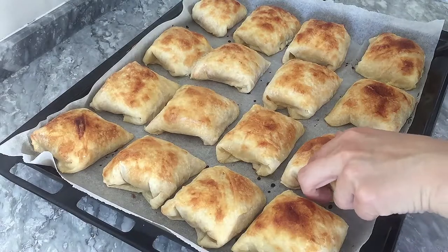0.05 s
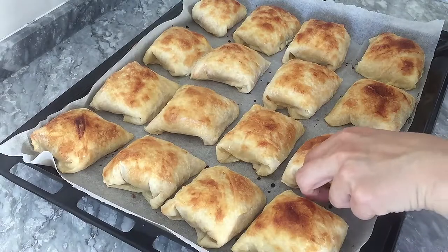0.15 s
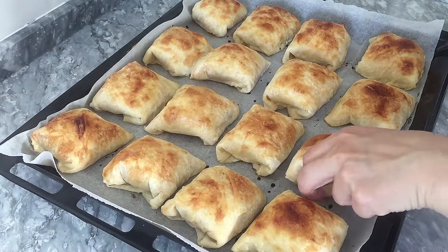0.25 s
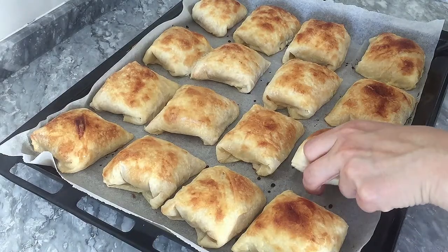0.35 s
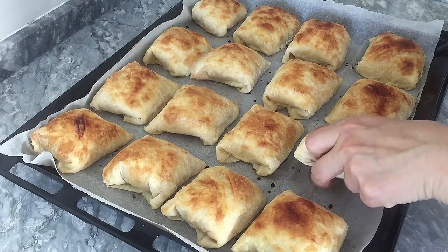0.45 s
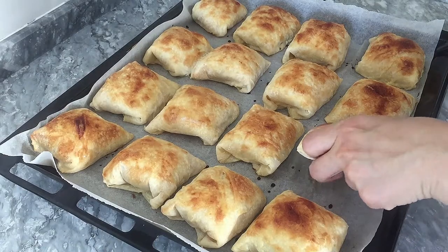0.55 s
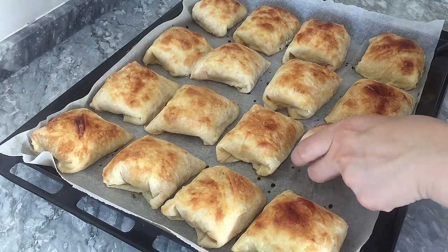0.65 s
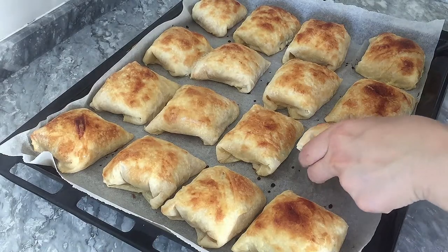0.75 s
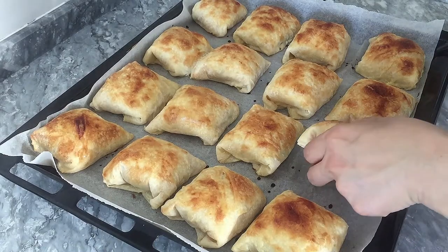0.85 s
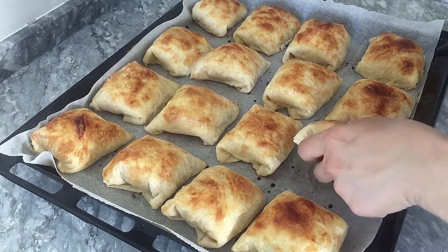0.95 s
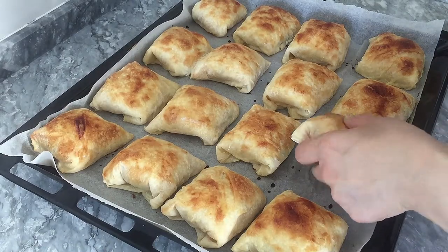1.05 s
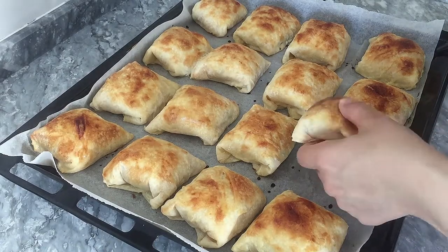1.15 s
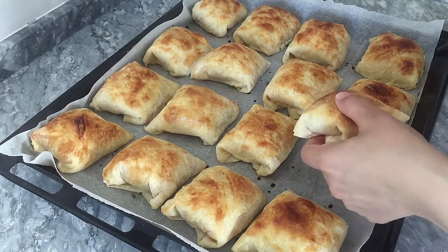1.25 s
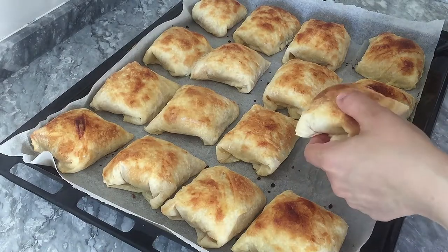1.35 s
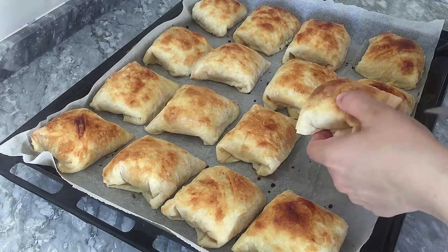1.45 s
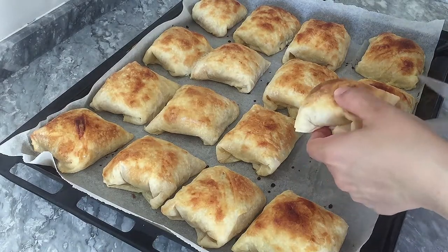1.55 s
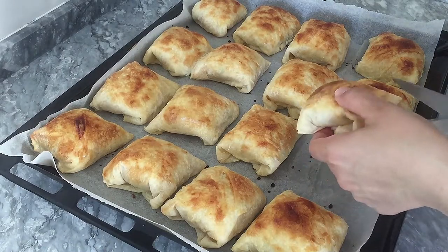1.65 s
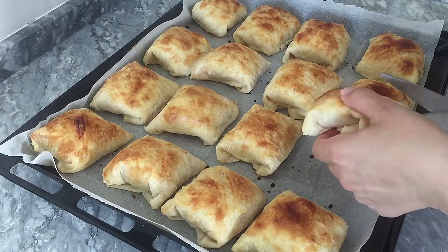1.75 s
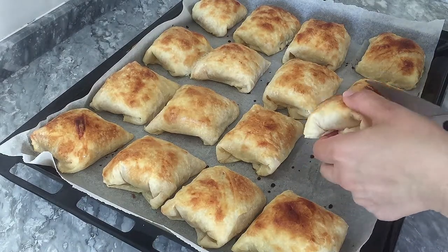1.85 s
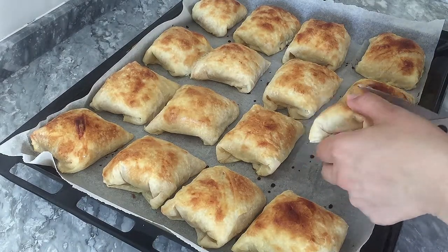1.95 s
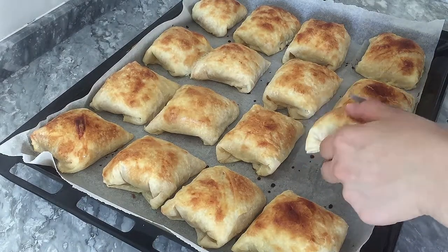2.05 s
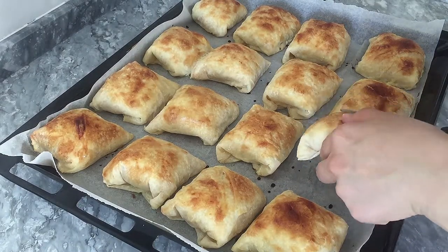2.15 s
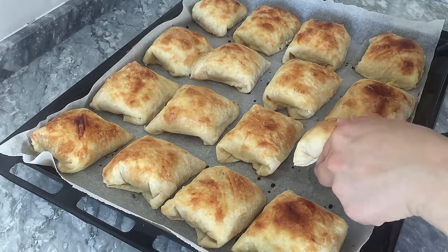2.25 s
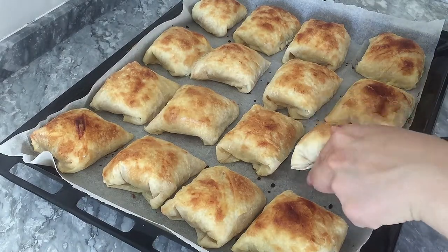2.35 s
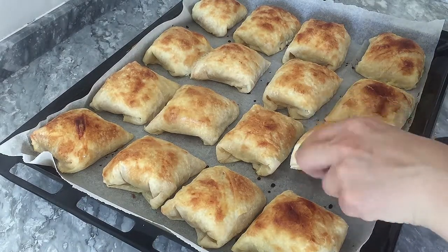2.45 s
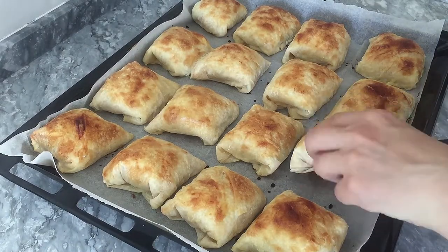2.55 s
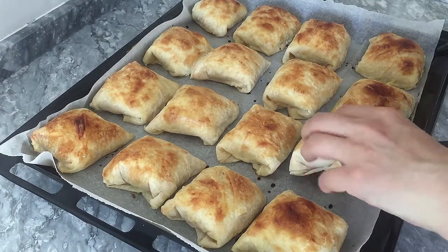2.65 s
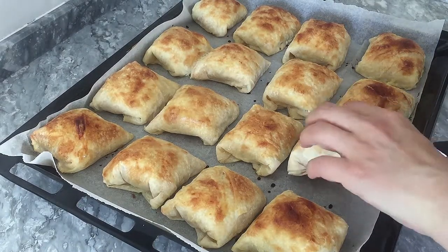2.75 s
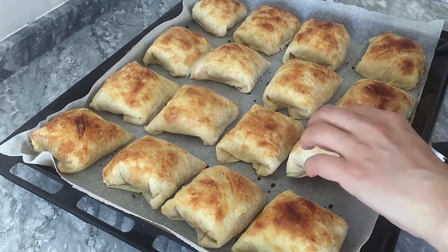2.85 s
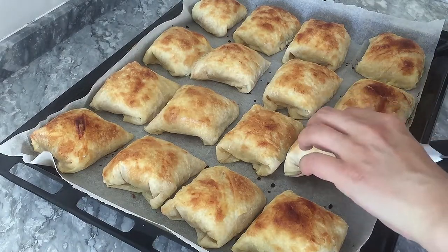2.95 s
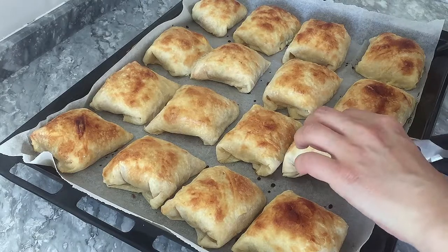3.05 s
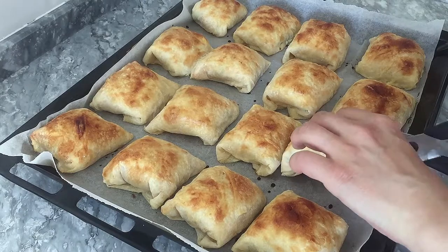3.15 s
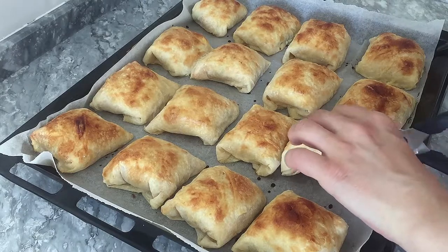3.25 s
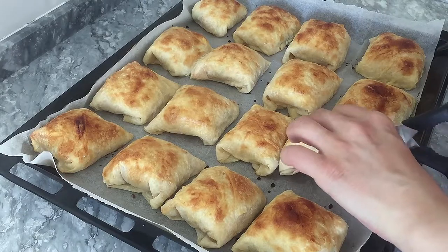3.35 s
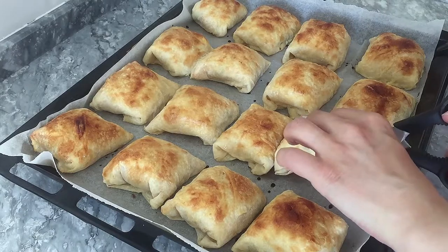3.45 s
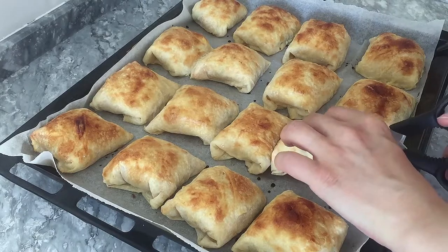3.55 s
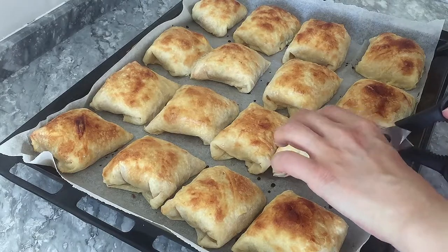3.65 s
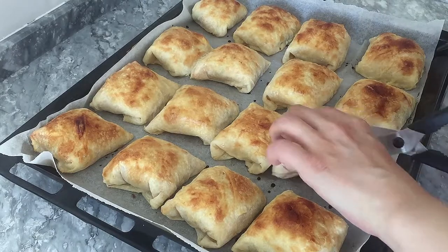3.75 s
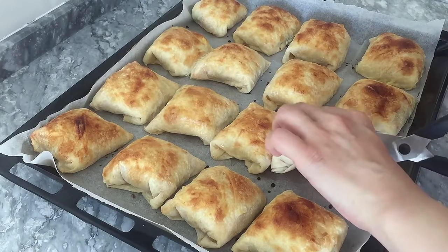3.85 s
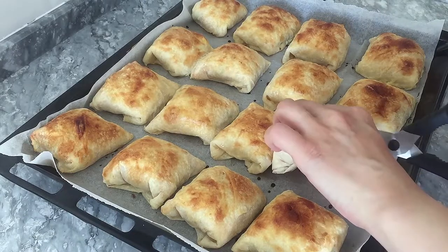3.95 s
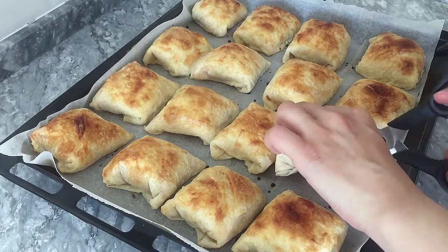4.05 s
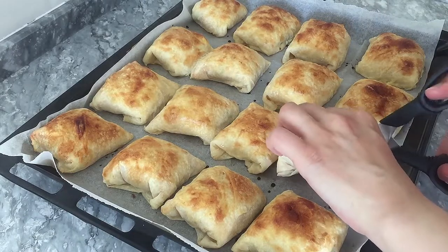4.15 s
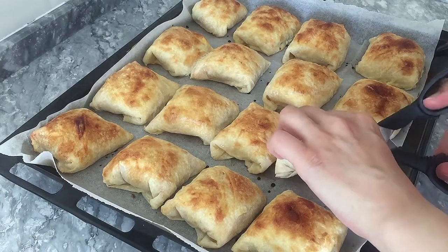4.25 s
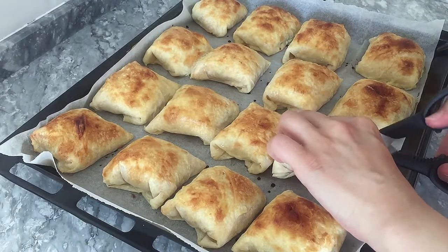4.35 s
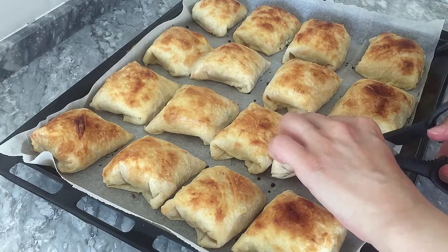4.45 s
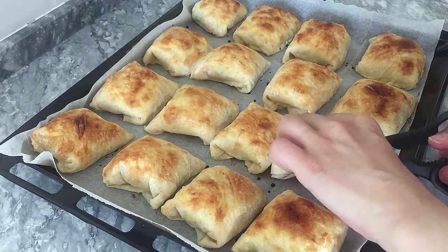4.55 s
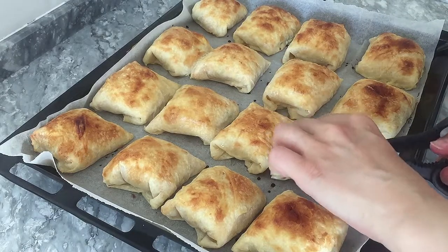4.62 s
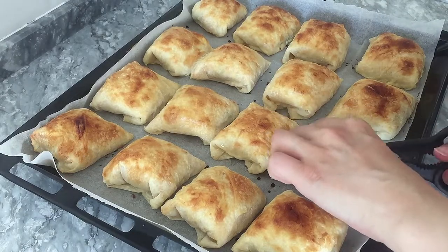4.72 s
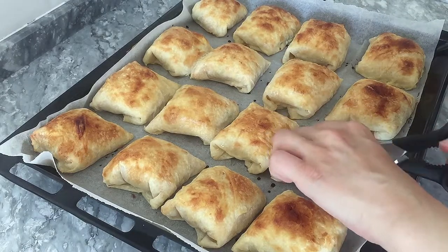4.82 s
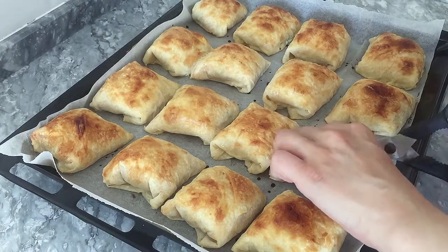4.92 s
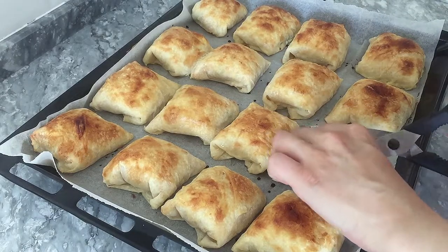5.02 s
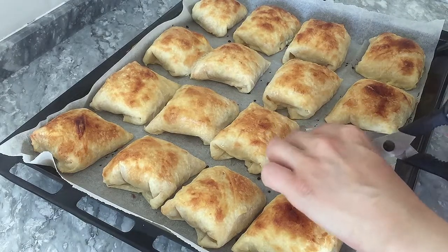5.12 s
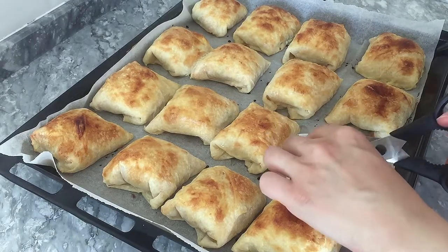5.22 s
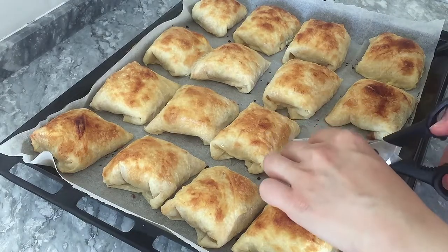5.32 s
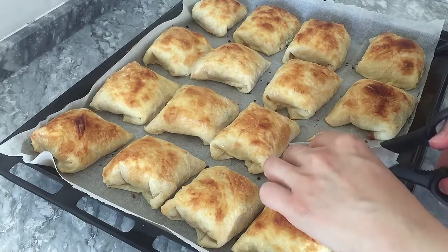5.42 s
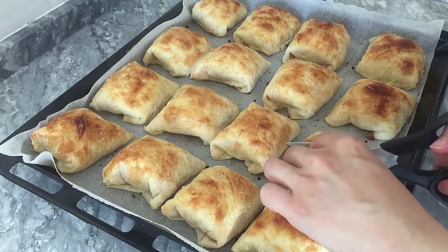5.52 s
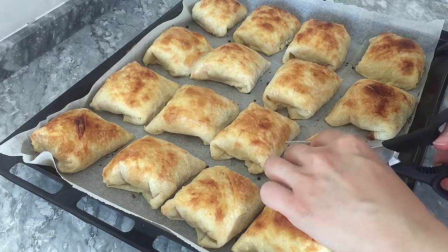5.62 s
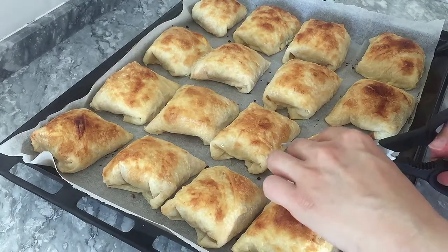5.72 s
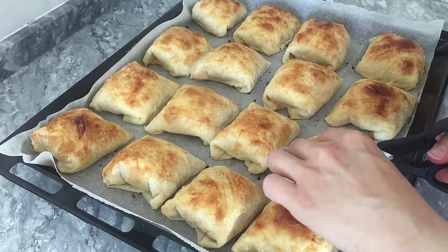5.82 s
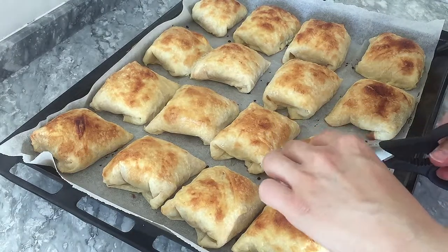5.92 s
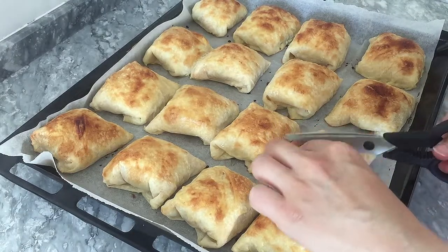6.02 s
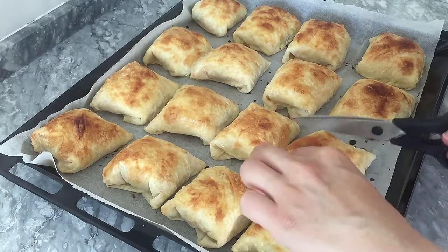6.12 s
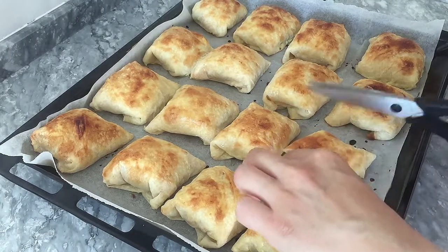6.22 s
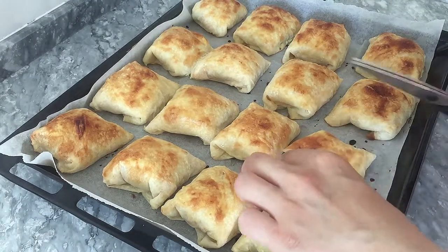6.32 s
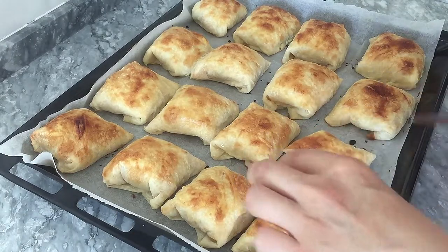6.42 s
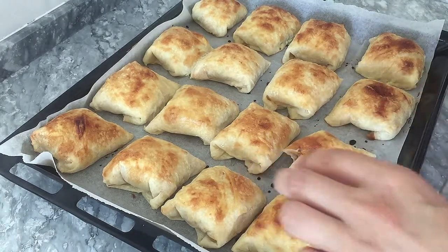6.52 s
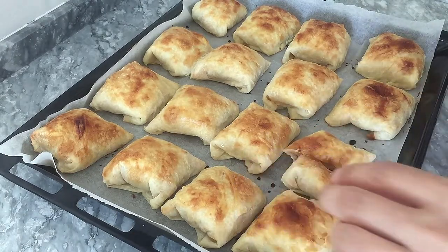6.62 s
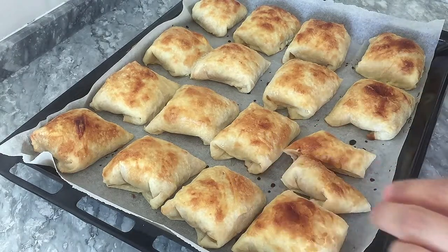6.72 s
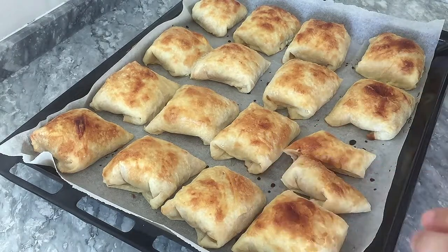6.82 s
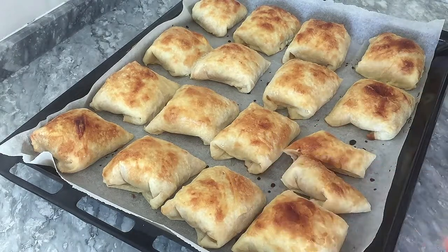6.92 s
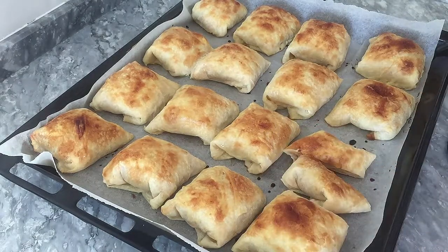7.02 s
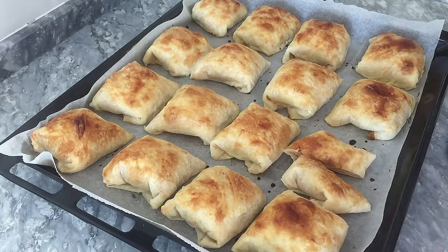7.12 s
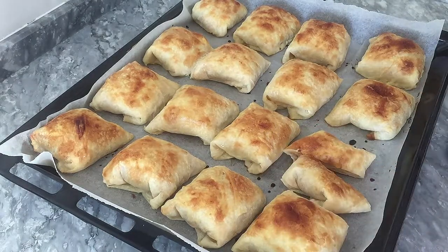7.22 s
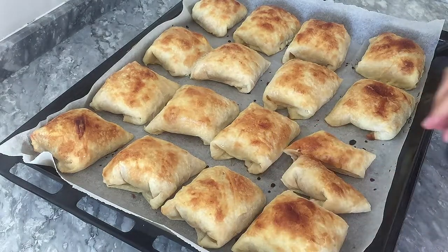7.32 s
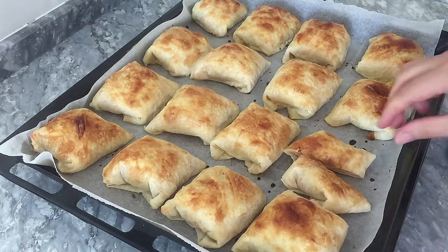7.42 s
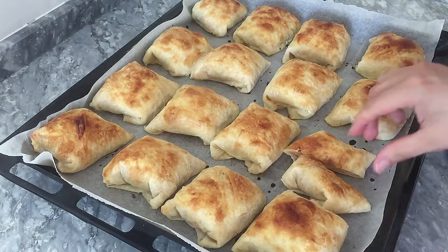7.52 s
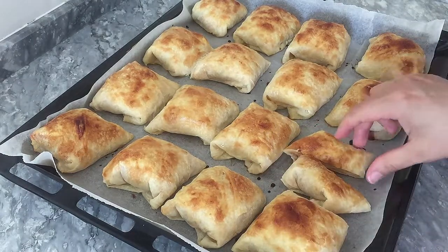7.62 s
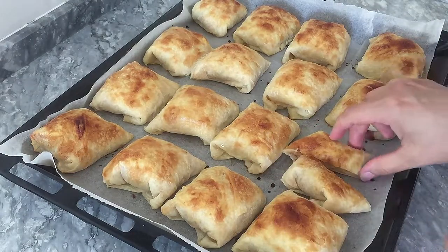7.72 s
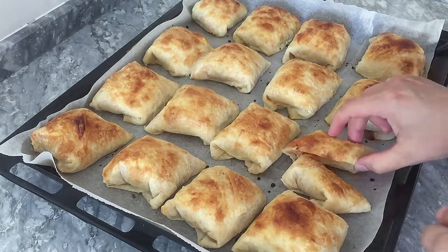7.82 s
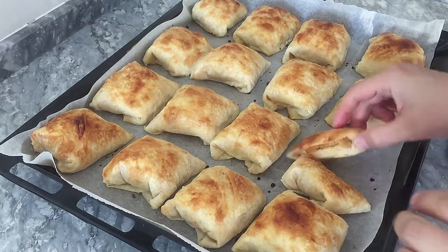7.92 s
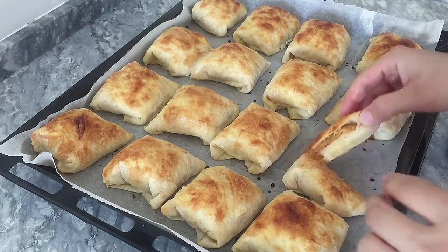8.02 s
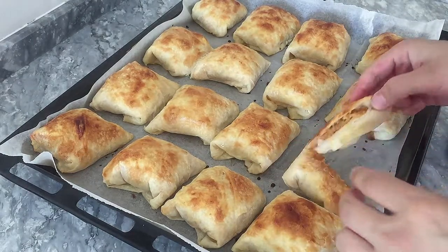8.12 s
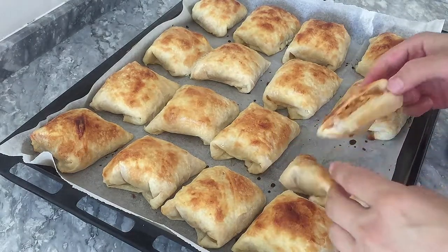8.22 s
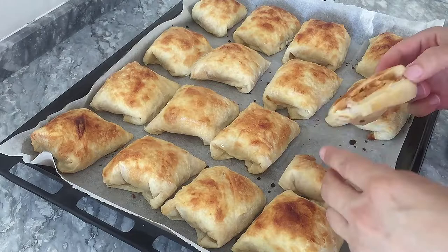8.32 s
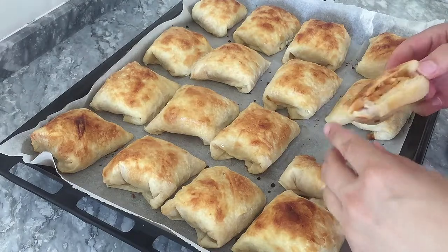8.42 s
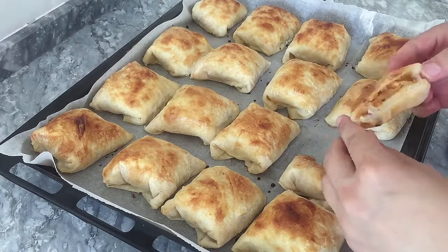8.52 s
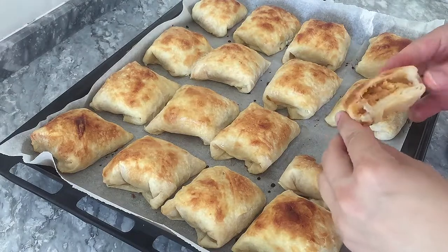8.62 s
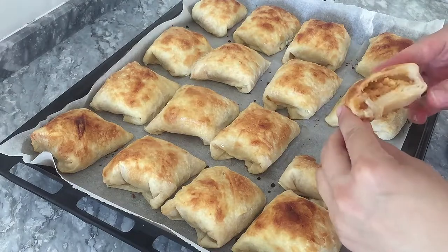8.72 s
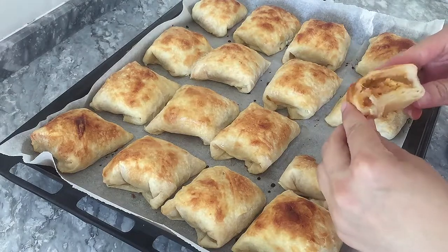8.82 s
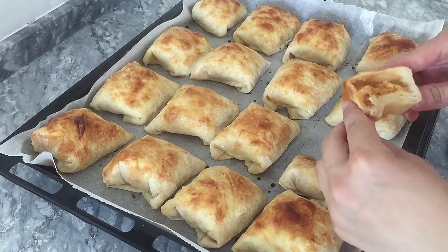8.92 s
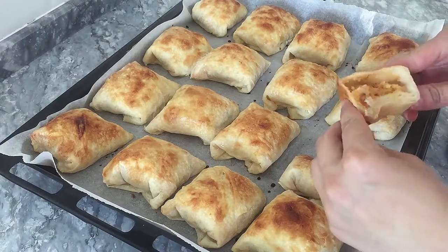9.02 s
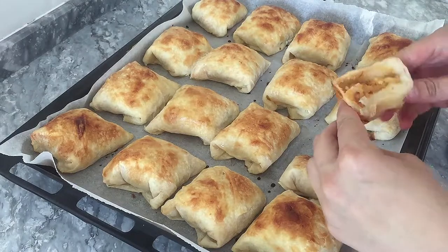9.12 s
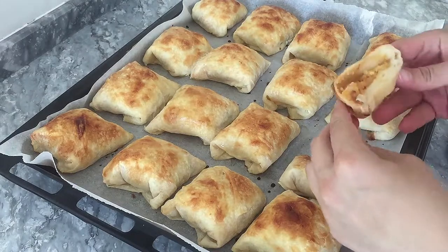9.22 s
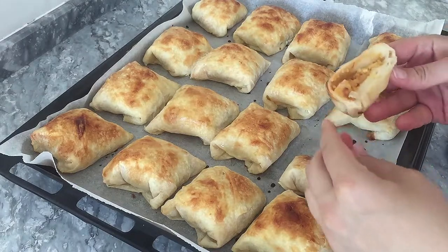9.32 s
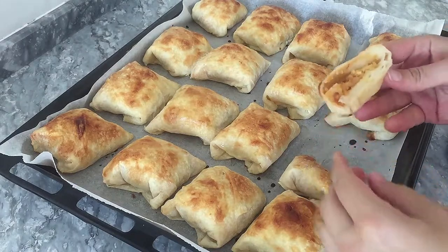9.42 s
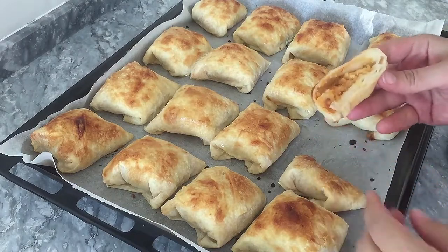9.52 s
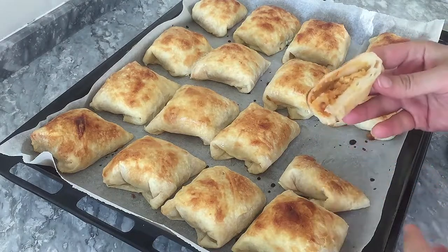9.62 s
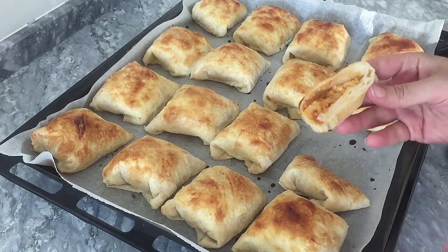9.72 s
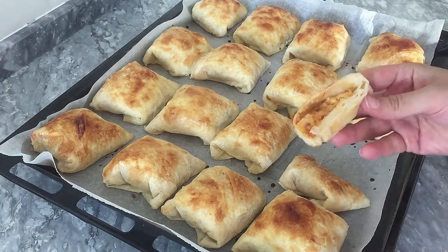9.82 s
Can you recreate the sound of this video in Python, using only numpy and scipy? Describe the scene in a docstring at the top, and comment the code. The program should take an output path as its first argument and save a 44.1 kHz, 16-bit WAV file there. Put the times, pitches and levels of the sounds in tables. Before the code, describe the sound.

Crisp baked pastry crackles and snaps as it is handled and cut, scissors clatter onto a stone counter, over a low throbbing hum.

```python
"""Two low motor hums beat in a quiet kitchen, then crisp pastry is lifted, cut with scissors and opened.
Flakes crackle, paper rustles, the lined tray is bumped, and the scissors clatter down on a stone counter.
Handling is coloured grains and hiss, and each flake is a brief filtered noise burst. Noise-driven modes
ring as tray, blades, handles and counter. The hums are sines over coloured noise, the air of the room.
"""
import sys
import numpy as np
from scipy import signal
from scipy.fft import rfft, irfft, next_fast_len
from scipy.io import wavfile
from scipy.ndimage import uniform_filter1d

SR = 44100
rng = np.random.default_rng(int(sys.argv[2]) if len(sys.argv) > 2 else 0)


def output_pcm(signal):
    """Save a mono or channel-first signal as 16-bit PCM at the path in sys.argv[1].

    Samples are clipped to [-1, 1] before scaling.
    """
    pcm = np.clip(np.atleast_2d(signal).T, -1, 1) * 32767
    wavfile.write(sys.argv[1], SR, np.round(pcm).astype(np.int16))


N = 435266

# Bursts of crackle as fingers and blades press crust and paper:
# start_s, hold_s, rustle_level_db, crunch_above_rustle_db
PRESSES = [(0.104, 0.054, -75.5, 3.5), (0.332, 0.048, -63, -4), (.395, 0.033, -55.5, -5.5),
           (0.609, 0.016, -57, -2), (0.668, 0.0072, -59, -2), (0.739, 0.018, -56.5, 0.5),
           (.852, 0.0081, -60, -6.5), (0.914, 0.034, -57.5, -6), (1.007, 0.039, -61.5, -4),
           (1.056, 0.033, -60, -3), (1.258, 0.036, -55.5, -18), (2.212, 0.033, -69.5, 1.5),
           (2.483, 0.029, -62.5, -3.5), (2.8, 0.056, -69.5, -3.5), (2.874, .22, -62.5, -2.5),
           (3.143, 0.014, -56.5, -2.5), (3.257, 0.0085, -61, -5), (3.466, 0.13, -54.5, -3),
           (3.599, 0.093, -58, -6.5), (3.782, 0.047, -69.5, 1), (3.893, 0.018, -55.5, -2),
           (3.966, 0.076, -60, -2.5), (4.059, .04, -64.5, -0.5), (4.227, 0.016, -61, -1.5),
           (4.273, 0.092, -68, 6.5), (4.42, 0.092, -59.5, -3.5), (4.528, 0.054, -54.5, -7),
           (4.665, 0.042, -63, 0), (4.724, 0.091, -63.5, -3.5), (4.886, 0.0077, -58, -4),
           (4.93, .01, -59, -4), (4.979, 0.048, -55.5, -3), (5.107, 0.12, -62.5, 0),
           (5.225, 0.045, -53.5, -1), (5.264, 0.058, -58, 7.5), (5.456, .07, -68.5, -1),
           (5.541, .03, -65.5, 0.5), (5.638, 0.011, -63.5, 3.5), (5.769, .015, -70.5, -1.5),
           (5.873, 0.26, -71, -2), (6.156, 0.028, -47.5, -0.5), (6.263, 0.072, -64.5, 4.5),
           (6.333, 0.058, -45, -9.5), (7.852, 0.032, -62.5, -1.5), (7.992, .055, -54.5, -8.5),
           (8.087, .03, -51.5, -6), (8.147, .06, -63.5, -12), (8.342, 0.033, -53.5, -6.5),
           (8.529, 0.008, -63, -24), (9.01, .07, -69, -16), (9.245, .002, -73, -19)]
# Light touch of the hands between the bursts: time_s, rustle_level_db
TOUCH = [(.05, -95), (.3, -71.5), (.48, -82), (1.0, -78), (1.2, -84), (1.84, -89), (1.9, -75), (2.2, -71.5),
         (2.3, -80), (2.8, -78), (5.1, -74), (5.4, -80), (6.4, -80), (6.52, -95), (7.78, -95), (7.9, -76.5),
         (8.45, -73), (8.55, -92.5), (8.88, -86.5), (9.0, -82), (9.15, -97)]
# Spectra of fine rustle, deeper crunch, and blades biting thick dough: frequency_hz, relative_level_db
RUSTLE_SPECTRUM = [(3000, -51.5), (4500, -1.5), (7000, 1), (9000, 2.5), (10500, -5), (12500, 1),
                   (15500, -9)]
CRUNCH_SPECTRUM = [(350, -20.5), (700, -1), (1300, -0.5), (2200, 0.5), (3200, 8.5), (4200, -1.5),
                   (6000, -34.5)]
GRIND_SPECTRUM = [(500, -36.5), (1100, -15), (1600, 5), (2400, 2), (3300, -16.5), (5000, -30.5)]
TOUCH_CRUNCH_DB = -0.9  # above the rustle
PRESS_RISE_DB_S, PRESS_FALL_DB_S = 653, 490


def handling():
    """Granular friction: many tiny breaks in paper and crust, whose spectrum deepens with the crunch."""
    ms = np.arange(0, N / SR, .001)
    touch = gain_of(np.interp(ms, *np.transpose(TOUCH), left=-200, right=-200))
    spells = [(touch, TOUCH_CRUNCH_DB)]
    for start, hold, rustle_db, crunch_db in PRESSES:
        press = burst(start, hold, rustle_db, PRESS_RISE_DB_S, PRESS_FALL_DB_S)
        spells.append((press, crunch_db))

    rustle_power, crunch_power, grind_power = np.zeros((3, len(ms)))
    for level, crunch_db in spells:
        # the stronger the crunch against the rustle, the more of it moves down into the grind
        thick = np.clip((crunch_db + 3) / 11, 0, .9)
        deep_power = (level * gain_of(crunch_db)) ** 2
        rustle_power += level ** 2
        crunch_power += deep_power * (1 - thick)
        grind_power += deep_power * thick

    source = grit(per_s=350, spread_db=3.2, hiss=1.2)
    source = mottled(source, patchy_db=3, size=512, frames=4, bins=4)
    rustle = smooth(np.sqrt(rustle_power)) * coloured(source, RUSTLE_SPECTRUM)
    crunch = smooth(np.sqrt(crunch_power)) * coloured(source, CRUNCH_SPECTRUM)
    grind = smooth(np.sqrt(grind_power)) * coloured(source, GRIND_SPECTRUM)
    return rustle + crunch + grind


# Single flakes snapping: start_s, peak_level_db, top_above_body_db
SNAPS = [(0.2117, -46.5, -28), (0.599, -39.5, 13), (0.7215, -47, -5), (0.7665, -43, 16),
         (0.9492, -27.5, 2.5), (1.037, -28, 8.5), (1.0905, -47, 3), (1.107, -44, 15), (1.2564, -41, 12),
         (2.7804, -31, 6), (2.8732, -39, 0), (2.8814, -44, -12), (2.903, -51, -4), (2.9254, -35.5, -6),
         (2.9595, -43, -8), (3.0155, -39.5, -1), (3.1563, -40.5, -2.5), (3.2639, -36, -12),
         (3.401, -48, 14), (3.4583, -37.5, -6), (3.4827, -27.5, -3.5), (3.5969, -32, 3), (3.654, -39, 5),
         (3.6794, -25.5, 3), (3.8896, -37, -7), (3.8989, -32.5, 0.5), (3.924, -38.5, 3), (4.2224, -46, -1),
         (4.302, -32.5, 2), (4.4111, -36, -16), (4.4767, -30, 1.5), (4.5522, -30.5, 7.5), (4.5694, -34, 14),
         (4.6006, -41, 16), (4.679, -36.5, 5), (4.7655, -35, 29), (4.7916, -34.5, 6.5), (4.8872, -39, 13),
         (4.975, -42, 2), (5.0019, -42, 13), (5.023, -37.5, -3), (5.044, -37, 6), (5.1401, -37, -1),
         (5.23, -29.5, 17), (5.2342, -32.5, -2), (5.2551, -28, 24), (5.321, -32.5, -22), (5.4034, -44, 20),
         (5.6366, -44.5, -11), (6.117, -39.5, -6), (6.15, -30, 1.5), (6.1539, -31, 1), (6.3172, -34, 7),
         (6.3275, -16, -39), (6.3309, -14.5, 16), (6.3851, -29.5, 2.5), (6.419, -40, 1),
         (6.487, -45.5, -5.5), (7.848, -43, 4), (8.0433, -37.5, 18), (8.169, -31.5, 29), (8.201, -48, -4),
         (8.325, -38, 5), (8.3406, -34.5, -11), (8.3698, -40, 13), (8.442, -32.5, 11.5), (8.533, -43.5, 0),
         (9.015, -47.5, -23), (9.0494, -52, -7), (9.078, -43.5, 2.5), (9.25, -46, 8)]
BODY_LOW_HZ, BODY_TOP_SPLIT_HZ, TOP_HIGH_HZ = 1700, 7000, 15500
SNAP_T60_S, SNAP_T60_S_PER_DB = 0.035, .0006  # decay at -44 dB; bigger flakes sound longer


def snaps():
    """Brittle fracture: each flake's sudden release is a tick and a short burst, in a colour of its own."""
    out, t = np.zeros(N), np.arange(SR // 8) / SR
    body_band = signal.butter(2, (BODY_LOW_HZ, BODY_TOP_SPLIT_HZ), "bandpass", fs=SR, output="sos")
    top_band = signal.butter(2, (BODY_TOP_SPLIT_HZ, TOP_HIGH_HZ), "bandpass", fs=SR, output="sos")
    for start, peak_db, top_db in SNAPS:
        t60 = SNAP_T60_S + SNAP_T60_S_PER_DB * (peak_db + 44)
        decay = .6 * gain_of(-60 * t / t60)
        tick = gain_of(-60 * t / .007)
        puff = rng.standard_normal(len(t)) * (decay + tick)
        # the flake's own brief ring: a random response of 41 samples
        flake = np.r_[2.5, rng.standard_normal(40) * gain_of(-np.arange(40) * .5)]
        puff = signal.lfilter(flake, [1], puff)
        body = evened(signal.sosfilt(body_band, puff))
        top = evened(signal.sosfilt(top_band, puff))
        snap = body + gain_of(top_db) * top
        add(out, start, gain_of(peak_db) * snap / abs(snap).max())
    return out


# Scissors bouncing on the counter, levels before the low cuts:
# start_s, blade_tick_peak_db, handle_knock_peak_db, knock_tilt_db_per_octave
DROPS = [(6.858, -51, -29, 5), (6.9485, -11.5, -23.5, -1), (6.966, -21.5, -31.5, -18),
         (6.9785, -22, -31.5, 0), (6.9867, -24, -43, 1), (6.9928, -31, -36, -6), (7.069, -41.5, -44, -4),
         (7.0939, -9, -19.5, 9.5), (7.125, -49, -31.5, 2), (7.15, -45, -36, 1), (7.1693, -12.5, -17, 1),
         (7.185, -24.5, -26.5, -4.5), (7.196, -33.5, -30.5, 2.5), (7.205, -36.5, -32, -1),
         (7.222, -44, -33.5, 7), (7.25, -51, -41, 4)]
# Blade chatter after the hard landings, before the low cut: start_s, hold_s, rms_level_db
CHATTER = [(6.959, 0.092, -48), (7.101, 0.0036, -42), (7.177, 0.037, -48.5)]
# Modes of blades, handles and stone counter: frequency_hz, relative_level_db, t60_s
BLADE_MODES = [(4230, -6.5, .006), (5470, 2, 0.0051), (6500, -4, 0.0052), (7130, -4, 0.00274),
               (8270, -3, 0.0074), (9200, 3.5, 0.0024), (11150, 2.5, 0.0019), (12100, -11, .003),
               (14000, -15.5, .003), (16100, -12.5, 0.009)]
HANDLE_MODES = [(388, -37, .06), (520.6, -11, 0.054), (613, -9, 0.095), (690, -7.5, 0.07),
                (855, -3.5, 0.055), (1000, -4.5, .05), (1217, 2.5, 0.065), (1543, -3.5, 0.055),
                (1853, -6, 0.03), (2204, -5.5, 0.022), (2816, -7.5, .02), (3250, -11.5, .015)]
COUNTER_MODES = [(180, 0, 0.051)]
CHATTER_RISE_DB_S, CHATTER_FALL_DB_S = 1200, 479.5
BLADE_LOW_HZ = 3300


def scissors():
    """Impact excitation: bounces drive blade, handle and counter modes; quick bounces blur to chatter."""
    knocks, thumps = np.zeros((2, N))
    rattle = grit(per_s=700, spread_db=0.5, hiss=1.2)
    rattle = signal.oaconvolve(rattle, ring(BLADE_MODES, count=6))[:N]
    chatter = sum(burst(*row, CHATTER_RISE_DB_S, CHATTER_FALL_DB_S) for row in CHATTER)
    ticks = evened(rattle) * smooth(chatter)
    for start, tick_db, knock_db, tilt_db in DROPS:
        add(ticks, start, gain_of(tick_db) * struck(BLADE_MODES, .018, blow=1.5))
        add(knocks, start, gain_of(knock_db) * struck(HANDLE_MODES, 0.088, tilt_db, blow=2.16))
        thump = struck(COUNTER_MODES, .1, tilt_db)
        swell = 1 - np.exp(-np.arange(len(thump)) / (0.011 * SR))  # the heavy slab starts slowly
        thump_db = knock_db - 13.5 - .6 * tilt_db  # louder knocks thump more, brighter ones less
        add(thumps, start, gain_of(thump_db) * thump * swell)
    return small(ticks, BLADE_LOW_HZ) + small(knocks) + thumps


# Dull bumps on the tray, before the low cut: start_s, peak_level_db
BUMPS = [(0.736, -44), (2.249, -50), (2.872, -44), (4.268, -26), (4.785, -39), (5.127, -51), (6.155, -39),
         (6.327, -33.5), (8.342, -50)]
# Short drags of pastry over the tray, before the low cut: start_s, hold_s, rms_level_db
DRAG = [(4.284, 0.0086, -47.5), (4.34, 0.044, -54), (4.495, 0.021, -57.5), (4.552, .01, -63),
        (4.751, .015, -56.5)]
# Modes of the tray: frequency_hz, relative_level_db, t60_s
TRAY_MODES = [(472, -9.5, 0.13), (668, -3, 0.062), (900, 1, 0.042), (1220, 1, 0.017), (1525, -1, 0.02),
              (1810, -6, 0.016), (2310, -8.5, .015)]
BUMP_T60_S = .075  # of the after-push
DRAG_RISE_DB_S, DRAG_FALL_DB_S = 900, 400


def bumps():
    """Damped plate modes: knocks and dragging ring the steel tray, damped by paper and pastry."""
    scrape = grit(per_s=300, spread_db=3, hiss=1)
    scrape = signal.oaconvolve(scrape, ring(TRAY_MODES, count=4))[:N]
    drag = sum(burst(*row, DRAG_RISE_DB_S, DRAG_FALL_DB_S) for row in DRAG)
    out = evened(scrape) * smooth(drag)
    for start, peak_db in BUMPS:
        add(out, start, gain_of(peak_db) * struck(TRAY_MODES, BUMP_T60_S, tilt_db=3, blow=6))
    return small(out)


# Lower hum, upper hum, mains buzz: centre_rms_level_db, waver_rms_db (the sign only flips the waver)
HUM_LEVELS = [(-59.5, -2.5), (-59, -1.5), (-75.5, 7)]
# The upper hum slips ahead of the lower one: time_s, beats_counted
BEATS = [(-.066, -1), (1.58, 13), (7.57, 65.1), (9.95, 85)]
# Kitchen air: frequency_hz, relative_level_db
AIR_SPECTRUM = [(30, -15), (45, -11.5), (75, -3.5), (100, 5.5), (140, -1), (165, -8.5), (250, -10.5),
                (440, -14.5), (520, -18.5), (900, -21), (2400, -29.5), (7000, -35), (10500, -40.5),
                (15500, -38.5)]
# The hums and deepest air drop out during the clatter: time_s, gain_db
BASS_DIP = [(6.95, -1.5), (6.99, -8.5), (7.47, -18.5), (7.5, -1)]
LOW_HUM_HZ, MAINS_HZ = 49.3, 100
AIR_DB, DIP_HZ = -60.5, 90  # centre level of the air; top of the air that dips


def kitchen():
    """Interference: two close hums beat as their phases slip, over a mains buzz and the air of the room."""
    t = np.arange(N) / SR
    slip = np.interp(t, *np.transpose(BEATS)) + .5  # opposite phase at every counted beat
    turns = [LOW_HUM_HZ * t, LOW_HUM_HZ * t + slip, MAINS_HZ * t]
    drone = mottled(rng.standard_normal(N), patchy_db=3, size=4096, frames=5, bins=2)
    start = rng.random()  # shared starting phase, in turns
    hums = np.zeros(N)
    for turn, (level_db, waver_db) in zip(turns, HUM_LEVELS):
        level = np.sqrt(2) * gain_of(level_db + waver_db * wander(3.3))
        hums += level * np.sin(2 * np.pi * (turn + start))
    air = gain_of(AIR_DB + 1.36 * wander(8)) * coloured(drone, AIR_SPECTRUM)
    deep_air = signal.sosfiltfilt(signal.butter(2, DIP_HZ, fs=SR, output="sos"), air)
    dip = gain_of(np.interp(t, *np.transpose(BASS_DIP)))
    return hums + air + (hums + deep_air) * (dip - 1)


# Reverberation of the room: frequency_hz, t60_s
ROOM_DECAY = [(200, 0.32), (1000, .25), (3000, 0.15), (8000, 0.1), (15000, 0.1)]
ROOM_DB = -11


def room(x):
    """Diffuse reverberation: sparse taps of random sign, each band dying at its own speed."""
    taps = np.zeros(SR // 2)
    at = np.arange(60, len(taps) - 20, 20)
    taps[at + rng.integers(0, 20, len(at))] = rng.choice([-1., 1.], len(at))
    hz, t, z = signal.stft(taps, SR, nperseg=256)
    decay = gain_of(-60 * t / read(ROOM_DECAY, hz)[:, None])
    tail = signal.istft(z * decay, SR, nperseg=256)[1]
    return signal.fftconvolve(x, tail / np.linalg.norm(tail))[:N]


def grit(per_s, spread_db, hiss):
    """Stick-slip friction: tiny breaks of uneven size over a smooth rubbing hiss."""
    happens = rng.random(N) < per_s / SR
    size = gain_of(spread_db * np.minimum(rng.exponential(1, N), 3)) * happens
    breaks = signal.lfilter([1], [1, -.96], size) * rng.standard_normal(N)  # each a brief puff
    return evened(breaks) + hiss * rng.standard_normal(N)


def ring(modes, tilt_db=0, count=3):
    """Modal decay: dying sines of joint peak 1, each mode a cluster of random levels and tunings."""
    t = np.arange(SR // 4) / SR
    hz, db, t60 = np.repeat(modes, count, axis=0).T[:, :, None]
    luck, detune = rng.standard_normal((2, len(hz), 1))
    level_db = db + tilt_db * np.log2(hz / 1000) + 2.5 * luck - 60 * t / t60
    sines = np.sin(2 * np.pi * hz * (1 + 0.0249 * detune) * t)
    out = (gain_of(level_db) * sines).sum(0)
    return out / abs(out).max()


def struck(modes, push_t60, tilt_db=0, blow=0):
    """Source-filter convolution: a rough push, after a sharp blow if any, drives the modes; peak 1."""
    t = np.arange(SR // 8) / SR
    rough = rng.standard_normal(len(t))
    push = rough * gain_of(-60 * t / push_t60)
    push += blow * abs(rough) * gain_of(-60 * t / .0012)
    out = signal.fftconvolve(push, ring(modes, tilt_db))
    return out / abs(out).max()


KNOCK_LOW_HZ = 430


def small(x, low_hz=KNOCK_LOW_HZ):
    """Radiation efficiency: small hard things radiate little bass, here a high-pass filter."""
    return signal.sosfilt(signal.butter(4, low_hz, "highpass", fs=SR, output="sos"), x)


def mottled(x, patchy_db, size, frames, bins):
    """Spectral modulation: random patches of stronger and weaker colour over time and pitch."""
    overlap = size * 3 // 4
    z = signal.stft(x, nperseg=size, noverlap=overlap)[2]
    patches = uniform_filter1d(rng.standard_normal(z.shape), bins, 0)
    patches = evened(uniform_filter1d(patches, frames, 1))
    out = signal.istft(z * gain_of(patchy_db * patches), nperseg=size, noverlap=overlap)[1]
    return evened(out[:len(x)])


def coloured(x, spectrum):
    """Linear filtering: shapes by a spectrum and scales to rms 1."""
    size = next_fast_len(len(x))
    gain = gain_of(read(spectrum, np.fft.rfftfreq(size, 1 / SR)))
    return evened(irfft(rfft(x, size) * gain, size)[:len(x)])


def wander(rate_hz):
    """Low-frequency noise: slow chance of rms 1 under a Gaussian spectrum."""
    z = rfft(rng.standard_normal(N))
    hz = np.arange(len(z)) * SR / N
    return evened(irfft(z * np.exp(-(hz / rate_hz) ** 2), N))


def burst(start, hold, db, rise_db_s, fall_db_s):
    """Exponential envelope, per millisecond: a steady rise in dB, a hold, a steady fall."""
    t = np.arange(0, N / SR, .001)
    rise_db = rise_db_s * np.maximum(start - t, 0)
    fall_db = fall_db_s * np.maximum(t - start - hold, 0)
    return gain_of(db - rise_db - fall_db)


def smooth(level):
    """Linear interpolation: an envelope from milliseconds to samples."""
    return np.interp(np.arange(N) / SR * 1000, np.arange(len(level)), level)


def add(mix, s, sound):
    """Superposition: lays a sound into the mix at a time in seconds."""
    part = mix[round(s * SR):][:len(sound)]
    part += sound[:len(part)]


def read(points, hz):
    """Logarithmic pitch: straight lines on a log-frequency axis."""
    f, value = np.transpose(points)
    return np.interp(np.log(hz + 1), np.log(f + 1), value)


def evened(x):
    """Power normalisation: scales to rms 1."""
    return x / np.sqrt(np.mean(x ** 2) + 1e-20)


def gain_of(db):
    """Level law: decibels to an amplitude factor."""
    return 10 ** (np.asarray(db) / 20)


def scene():
    """Direct and reverberant sound: close hits with a little room, then handling, over the kitchen."""
    hits = snaps() + bumps() + scissors()
    return (hits + gain_of(ROOM_DB) * room(hits) + handling() + kitchen())[None]


MIC_LOW_HZ, EDGE_HZ = 34, 15900


def record(dry):
    """Band limiting: the microphone loses the deepest bass, and a steep filter ends the treble."""
    heard = signal.sosfilt(signal.butter(2, MIC_LOW_HZ, "highpass", fs=SR, output="sos"), dry)
    low_pass = signal.firwin(255, EDGE_HZ, window=("kaiser", 9), fs=SR)
    return signal.oaconvolve(heard, low_pass[None], "same")


dry = scene()
out = record(dry)
output_pcm(out)
```